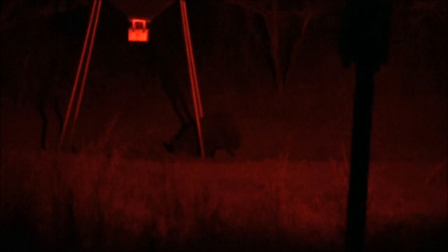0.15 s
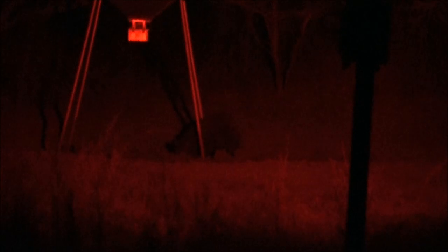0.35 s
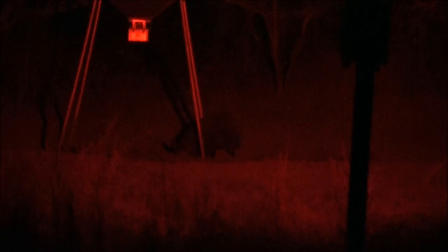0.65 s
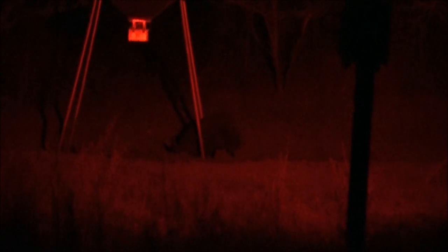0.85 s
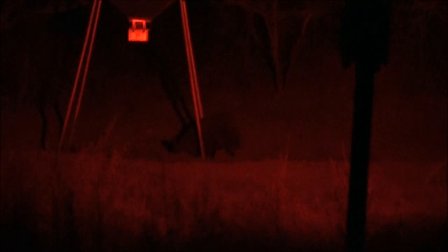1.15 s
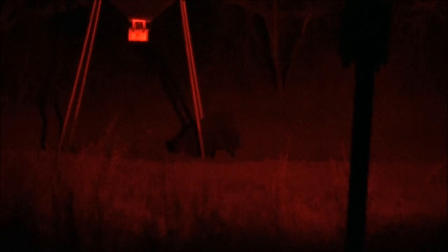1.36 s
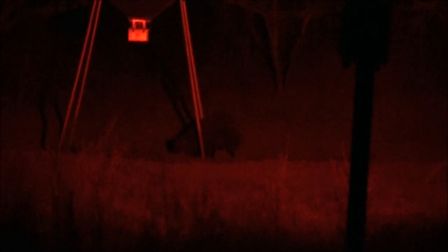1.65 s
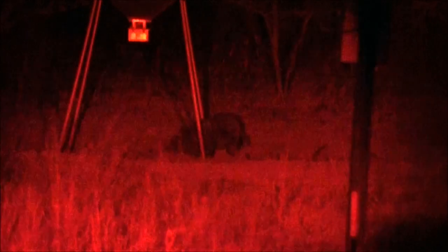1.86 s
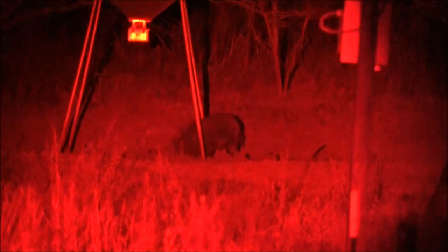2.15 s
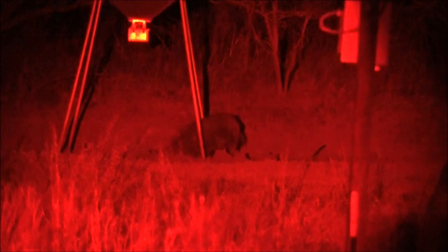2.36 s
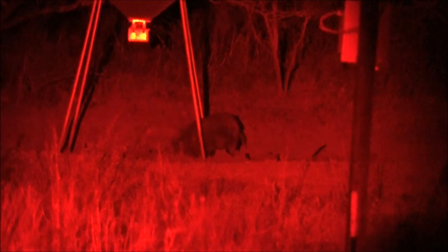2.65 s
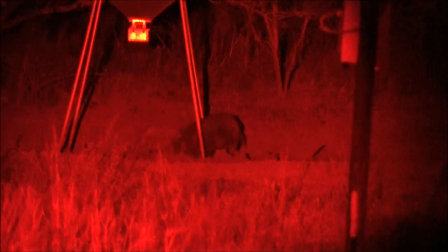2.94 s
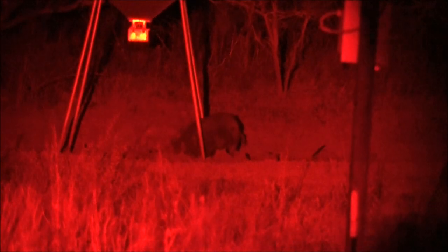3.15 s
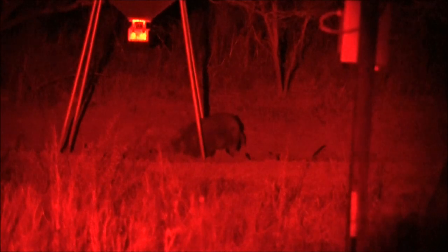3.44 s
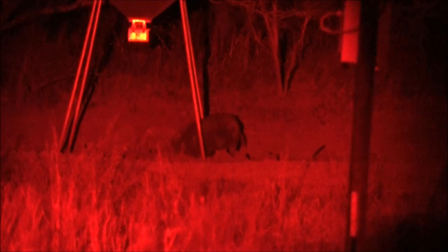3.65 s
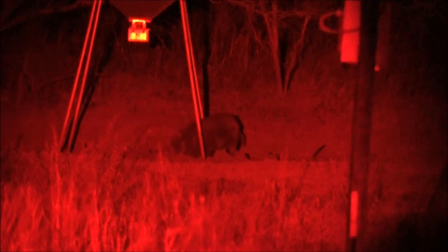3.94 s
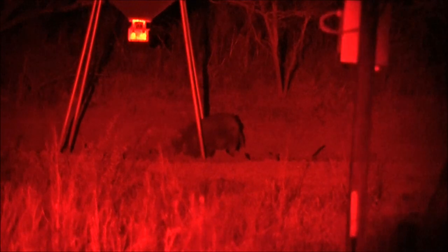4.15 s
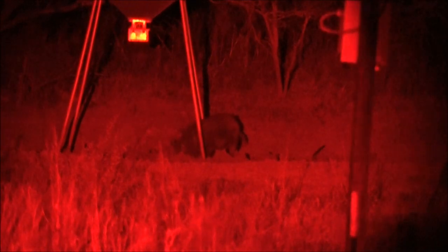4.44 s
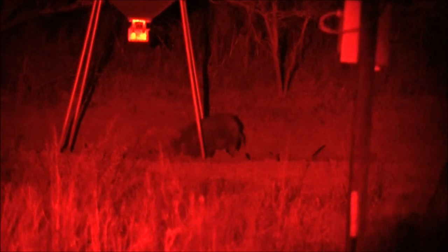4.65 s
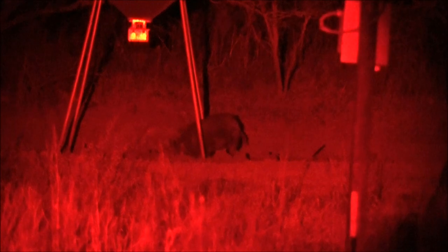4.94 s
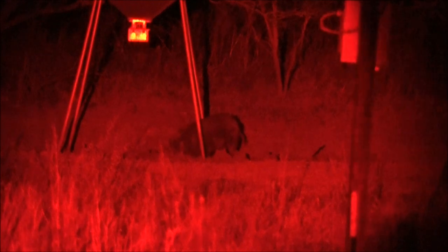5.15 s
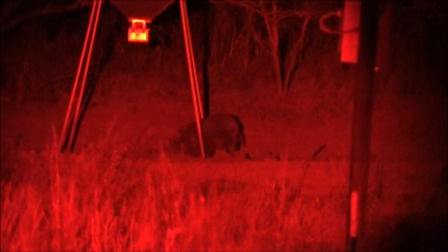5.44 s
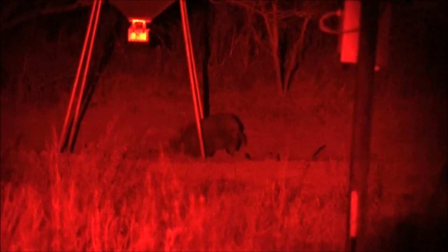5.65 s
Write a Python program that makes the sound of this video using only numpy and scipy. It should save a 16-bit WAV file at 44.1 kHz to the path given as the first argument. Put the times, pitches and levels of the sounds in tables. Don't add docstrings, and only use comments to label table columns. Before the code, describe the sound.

At night in dry brush, a dense steady chorus of crickets surrounds a small stereo camera, with katydids rasping as a fine high hiss above. Irregular low wind thumps bump the microphone, clustered at the start, around one second, near 2.8 and after five. A far engine idles underneath. Two crisp dry ticks snap at about 2.0 and 2.3 seconds; other ticks are barely audible.

```python
import sys
import numpy as np
from scipy import signal
from scipy.fft import irfft, next_fast_len
from scipy.io import wavfile
from scipy.ndimage import uniform_filter1d

SR = 44100
rng = np.random.default_rng(int(sys.argv[2]) if len(sys.argv) > 2 else 0)


def bounce(signal):
    frames = np.transpose(np.atleast_2d(signal))
    limited = np.clip(frames, -1, 1)
    pcm = np.round(limited * 32767).astype(np.int16)
    wavfile.write(sys.argv[1], SR, pcm)


def nominal_scale(level):
    x = np.asarray(level, float) / 20
    return 10 ** x


N = 255339

# (frequency [Hz], left-right coherence [0-1], left's phase lead [rad], left over right [dB])
PORT_PAIR = [(40, 0.99, 0, 0.9), (198, 0.975, 0, .3), (705, 0.94, 0, -1), (1120, .97, 0, 0),
             (4835, .985, 0, .4), (5520, 1, -0.2, .2), (6500, 0.88, -0.5, 0), (7600, .35, 1.5, -2),
             (7900, .05, 2.5, -1.5), (8470, 0.56, 3.5, 1.5), (10140, 0.65, 5.4, 4), (11260, 0.68, 5.9, 4.2),
             (11600, 0.99, 6.3, 0.5), (16000, 0.82, 6.3, 1.5)]


def at_hz(points, hz, axis=1):
    columns = np.transpose(points)
    return np.interp(np.log(hz + 1), np.log(columns[0] + 1), columns[axis])


def over_time(points, axis=1):
    columns = np.transpose(points)
    return np.interp(np.arange(N) / SR, columns[0], columns[axis])


def drift(per_s, size=N):
    values = rng.standard_normal(600)
    moments = np.arange(size) * (N / SR / size) * per_s
    return np.interp(moments, np.arange(600), values) * np.sqrt(3 / 2)


def during(spans, t):
    return sum((t > start) & (t < end) for start, end in spans) > 0


def evened(x):
    return x / np.sqrt(np.mean(x ** 2) + 1e-20)


def hiss(gain):
    size = next_fast_len(N)
    hz = np.fft.rfftfreq(size, 1 / SR)
    a, b, c, d = rng.standard_normal((len(hz), 4)).T
    coherence = np.clip(at_hz(PORT_PAIR, hz), 0, 1)
    left, unrelated = a + 1j * b, c + 1j * d
    delayed = left * np.exp(-1j * at_hz(PORT_PAIR, hz, axis=2))
    right = coherence * delayed + np.sqrt(1 - coherence ** 2) * unrelated
    tilt = nominal_scale(at_hz(PORT_PAIR, hz, axis=3) / 2)
    return evened(irfft(np.array([left * tilt, right / tilt]) * gain(hz), size)[:, :N])


def outlined(points):
    return lambda hz: nominal_scale(at_hz(points, hz)) * (hz > points[0][0]) * (hz < points[-1][0])


def crickets():
    # (frequency [Hz], level [dB])
    chirper_outline = [(1470, -4.5), (2500, -30), (2710, 13), (2940, 6.5), (3000, -9.5), (3900, -13.5),
                       (6600, -120)]
    tree_outline = [(1740, -36.5), (2950, -19.5), (3190, -1.5), (3360, 4), (3490, -7.5), (3660, -8.5),
                    (4050, -23), (5260, -80), (8910, -120)]
    ground_outline = [(2620, -63), (4450, -31), (5370, -8), (5870, 1.5), (6280, -4), (6750, -27),
                      (8780, -51), (14900, -120)]
    # (time [s], level [dB])
    chirper_swell = [(0, -56), (1, -59), (2.4, -59.5), (3.2, -57), (3.75, -63), (5.79, -61)]
    tree_swell = [(0, -43), (1, -42.5), (1.9, -41.5), (2.4, -43.5), (3.2, -42.5), (3.8, -42.5), (4.2, -43),
                  (5.6, -43.5), (5.79, -45)]
    chirp_turns = 3.6 * np.arange(N) / SR + 0.3 * drift(1.41)
    chirps = nominal_scale(1.1 * np.sin(2 * np.pi * (chirp_turns + 0.3)))
    low = chirps * chorus(chirper_outline, 2680, 2900, count=3, per_s=61., spread=0.009, duty=.7,
                          glide=0.027, far=0.77)
    tree = chorus(tree_outline, 3150, 3480, count=4, per_s=66., spread=.004, duty=.65, glide=.04, far=0.68)
    ground = chorus(ground_outline, 5250, 6350, count=8, per_s=75., spread=.2, duty=.6, glide=.05, far=0.93)
    ground_db = -31.5 + 0.17 * drift(5.)
    return nominal_scale(over_time(chirper_swell)) * low + nominal_scale(over_time(tree_swell)) * tree + nominal_scale(ground_db) * ground


def chorus(outline, low_hz, high_hz, count, per_s, spread, duty, glide, far):
    near = np.zeros((2, N), np.float32)
    for hz in np.linspace(low_hz, high_hz, count):
        luck = rng.standard_normal(3)
        stroke_rate = per_s * (1 + spread * luck[0] + .02 * drift(6.))
        turns = np.cumsum(stroke_rate) / SR + luck[1]
        stroke = np.clip((turns % 1) / duty, 0, 1)
        start = rng.uniform(0, 2 * np.pi, 900)[turns.astype(int) % 900]
        sliding_hz = hz * (1 + glide * (.5 - stroke))
        phase = (2 * np.pi * np.cumsum(sliding_hz) / SR + start) % (2 * np.pi)
        loudness = nominal_scale(at_hz(outline, hz)) * abs(1 + 0.32 * drift(3.4))
        envelope = loudness * np.sin(np.pi * np.float32(stroke)) ** 2
        scatter = np.sqrt(-2 * np.log(np.clip(at_hz(PORT_PAIR, hz), .01, 1)))
        lead = at_hz(PORT_PAIR, hz, axis=2) + luck[2] * scatter
        near += envelope * np.cos(np.float32([phase, phase - lead]))
    far = np.clip(far, 0, 1)
    return np.sqrt(1 - far) * evened(near) + np.sqrt(far) * hiss(outlined(outline))


def katydids():
    # (frequency [Hz], level [dB])
    rasp_outline = [(3880, -44), (6600, -22), (6840, -14), (7740, -7.5), (8600, -13), (10500, -3),
                    (11800, -0.5), (14300, -8.5), (15700, -12.5)]
    # (time [s], depth [dB])
    throb_depth = [(0, 0.6), (.9, 1), (1.5, .5), (3.5, 0.3), (4.8, 0.54), (5.3, 0.3), (5.79, .8)]
    turns = 13.0 * np.arange(N) / SR + 0.21 * drift(3.05) + 0.14
    throb_db = over_time(throb_depth) * (np.cos(2 * np.pi * turns) + 1.4 * np.cos(4 * np.pi * turns))
    shimmer_db = 0.18 * drift(0.92) + 0.54 * drift(21.94) + 0.081 * drift(30.)
    return nominal_scale(-35.5 + throb_db + shimmer_db) * hiss(outlined(rasp_outline))


def twigs():
    # (time [s], peak [dB], pitch [Hz], ring T60 [s], brightness [-])
    snaps = [(.224, -48, 1900, .006, .5), (.646, -48, 1880, 0.0042, 0.6), (1.955, -54, 1900, 0.007, .5),
             (2.0402, -18, 2100, 0.0027, 0.8), (2.3163, -24, 1640, 0.003, 1.1),
             (2.876, -54, 1510, 0.0066, .3), (3.33, -46, 1370, .015, 0.1), (3.345, -46, 1450, 0.019, 0.2),
             (3.415, -50, 1300, .015, 0), (4.49, -50, 1450, 0.011, .1), (4.67, -55, 1400, .015, .1),
             (5.107, -51, 1500, .008, .3)]
    # (time [s], level [dB])
    grass_brush = [
        (.2, -60),
        (.225, -54),
        (.25, -51),
        (.27, -66),
    ]
    out, t = np.zeros(N + 2000), np.arange(900) / SR
    for s, db, hz, t60, bright in snaps:
        ring = np.sin(2 * np.pi * hz * t)
        for ratio in (1.4, 2.0, 2.75, 3.2):
            if ratio * hz < 5700:
                ring += bright * np.sin(2 * np.pi * ratio * hz * t)
        ring *= nominal_scale(db - 60 * t / max(t60, .001)) * np.minimum(t / 0.00017, 1)
        ring = signal.lfilter(*signal.butter(2, 0.75 * hz, "high", fs=SR), ring)
        for late_s, share in ((0, 1), (.005, 0.21)):
            out[round((s + late_s) * SR):][:900] += share * ring
    grass = hiss(lambda hz: (hz > 500) / (1 + (hz / 2800.0) ** 4))
    grass = grass * during([(grass_brush[0][0], grass_brush[-1][0])], np.arange(N) / SR)
    return out[:N] * nominal_scale([[.6], [-.6]]) + nominal_scale(over_time(grass_brush)) * grass


def engine():
    # (time [s], rate [firings/s])
    firing_rate = [(0, 24.1), (2.2, 24.1), (2.6, 24.32), (4.2, 24.3), (4.5, 24.15), (5.79, 24.15)]
    # (time [s], level of one strong order [dB], load added to the high orders [dB])
    running = [(0, -45, 1), (.6, -45.5, 3), (1.5, -46.5, 4.5), (2.2, -49, -0.5), (3, -45, -5.5),
               (4, -48, -1), (5, -53, -1), (5.79, -50, -4.5)]
    # (multiple of the firing rate [-], level [dB])
    exhaust_orders = [(1, -20), (2, -39), (3, -1), (4, 0), (5, 0.5), (6, 2.5), (7, -1.5), (8, -17),
                      (9, -12.5), (10, -35), (11, -22), (12, -11), (13, -10.5), (14, -36), (15, -17),
                      (16, -39.5), (17, -49), (18, -29), (19, -45), (20, -23), (21, -29.5), (22, -25),
                      (23, -23), (24, -27), (25, -31), (26, -23.5), (27, -30)]
    every = 16
    turns = (np.cumsum(over_time(firing_rate)) / SR)[::every] + 0.1995
    size = len(turns)
    orders, load_db = np.zeros(size), over_time(running, axis=2)[::every]
    for k, db in exhaust_orders:
        lag = 0.03056 * k ** 2 + 0.045 * k * drift(7., size)
        order_db = db + load_db * (k >= 9) + 1.45 * drift(3.06, size)
        orders += nominal_scale(order_db) * np.cos(2 * np.pi * k * turns - lag)
    exhaust = nominal_scale(over_time(running)) * signal.resample_poly(orders, every, 1)[:N]
    return np.sqrt(2) * (exhaust + gear_whine())


def gear_whine():
    # (start [s], rise [s], fade [s], top [dB])
    swells = [
        (.55, 0.52, 0.51, -63),
        (2.1, .2, 0.27, -78),
        (3.7, 0.3, 1.4, -69.5),
    ]
    t = np.arange(N) / SR
    gain = nominal_scale(-78)
    for s, rise, fade, db in swells:
        away = np.maximum((s + rise - t) / rise, (t - s - rise) / fade)
        gain = gain + nominal_scale(db - 14.5 * away ** 1.6)
    return gain * np.cos(2 * np.pi * np.cumsum(769 + 1.41 * drift(5.8)) / SR)


def wind():
    # (frequency [Hz], density [dB/Hz])
    still_air = [(25, -32), (60, -8), (150, -13), (310, -22.5), (440, -33.5), (600, -26), (720, -36),
                 (1250, -35), (1600, -42.5), (1800, -37.5), (2400, -46.5), (4300, -46), (4700, -48)]
    # (low corner [Hz], high corner [Hz], steepness [-], level [dB])
    turbulence = [
        (33.3, 76, 4.5, 0.5),
        (76.3, 156, 3.1, -0.83),
        (203, 308, 3.5, -2),
    ]
    lumps, strength = drift(28.), eddies()
    out = nominal_scale(-46) * hiss(outlined(still_air))
    for k, (low_hz, high_hz, fall, db) in enumerate(turbulence):
        def band_gain(hz):
            low = hz / low_hz
            return low ** 3.52 / (1 + low ** 4.46) / (1 + (hz / high_hz) ** fall)

        band = hiss(band_gain)
        power = uniform_filter1d((band ** 2).mean(0), size=2400)
        band = band / np.sqrt(power + 0.3)
        out += strength[k] * nominal_scale(db + 1.25 * lumps) * band
    return out


def eddies():
    # (time [s], level [dB])
    breeze_flow = [(0, -31), (.6, -36), (1.5, -36.5), (2.2, -40), (2.6, -42.5), (3, -46), (3.4, -45),
                   (3.7, -41.5), (4.3, -47), (4.6, -42.5), (5.1, -38), (5.79, -42)]
    # (time [s], strength [dB], thud over buffet [dB], flutter over buffet [dB])
    strikes = [(0.081, -24, -3, -8), (0.211, -20.5, -5.5, -12), (.35, -35, 2, -11), (0.438, -31.5, 2, -21),
               (0.548, -26.5, -1.5, -14), (0.678, -38, 1, -9), (0.902, -33, -1.5, -9),
               (1.056, -22, -21, -21), (1.17, -29, -8, -20), (1.294, -36, -5, -6), (1.673, -33, 1.5, -18),
               (1.92, -35, -12, -9), (2.27, -36.5, 5, -13), (2.518, -37.5, -1, -12),
               (2.736, -21.5, -17, -7), (2.843, -24, -15, -10), (3.59, -28, -7, -14), (3.657, -37, 3, -4),
               (3.977, -29, -18, -10), (4.04, -41, 8, -1), (4.548, -36, -9, -12), (4.679, -25.5, -4, -12),
               (4.758, -27.5, -18, -30), (4.92, -44, -20, -14), (4.998, -35, -2, -19),
               (5.19, -25, -2, -7.5), (5.299, -22, -10, -17), (5.376, -20.5, -19, -13.5),
               (5.6, -39, -16, -11), (5.78, -38, -6, -22)]
    fall_db_per_s = [[233], [283], [400.]]
    t = np.arange(N) / SR
    power = nominal_scale(over_time(breeze_flow) + np.array([[-13.5], [0], [-9]])) ** 2
    for s, db, thud_db, flutter_db in strikes:
        near = slice(max(round((s - .3) * SR), 0), round((s + .3) * SR))
        fall_db = np.multiply(fall_db_per_s, abs(t[near] - s))
        power[:, near] += nominal_scale(db + np.array([[thud_db], [0], [flutter_db]]) - fall_db) ** 2
    return np.sqrt(power)


def scene():
    return crickets() + katydids() + twigs() + engine() * nominal_scale([[.2], [-.2]]) + wind()


def pan_treble(z, hz, t, wobble):
    # (from [s], to [s])
    left_spells = [(.15, .77), (.97, 1.24), (1.43, 2.0), (2.29, 2.82), (3.24, 3.29), (3.7, 4.7),
                   (4.75, 5.14), (5.45, 5.79)]
    # (from [s], to [s])
    joined_spells = [(.78, .96), (1.38, 1.8), (2.15, 2.18), (2.9, 2.92), (3.67, 3.69), (3.87, 4.06),
                     (4.7, 4.88), (5.56, 5.65)]
    balance_db = at_hz(PORT_PAIR, hz, axis=3)[:, None]
    panned = during(left_spells, t) & (drift(30., size=len(t)) + .75 > 0)
    joining = during(joined_spells, t)
    top = hz[:, None] > 11500 + 700 * ~panned + 250 * wobble[0]
    joined = top | (joining & (hz > 4600)[:, None])
    top_pan_db = 1.34 * panned * ~(joining & (wobble < .3))
    lower_pan_db = 4.0 * np.round(balance_db / 7.0 + .17 * wobble)
    pan = nominal_scale(np.where(top, top_pan_db, lower_pan_db))
    shared = z[0] * nominal_scale(-balance_db / 2 - 0.5)
    return np.where(joined, [shared * pan, shared / pan], z)


def drop_weak(left, right, hz, wobble):
    # (frequency [Hz], mid [dB], side [dB])
    floors = [(300, -100, -90), (800, -96, -87), (1500, -89, -78), (2400, -84.5, -74), (2700, -86, -72),
              (3300, -84, -70.5), (3900, -78.5, -70), (4600, -77, -70), (5400, -85, -78), (6700, -85, -78),
              (7200, -95, -88), (11500, -95, -98)]
    mid, side = (left + right) / 2, (left - right) / 2
    mid_floor = nominal_scale(at_hz(floors, hz)[:, None] + 1.9 * uniform_filter1d(wobble, size=3, axis=1))
    side_floor = nominal_scale(at_hz(floors, hz, axis=2)[:, None] + 1.4 * wobble)
    mid_rms = np.sqrt(abs(uniform_filter1d(abs(mid) ** 2, size=6, axis=0)))
    side_rms = np.sqrt(abs(uniform_filter1d(abs(side) ** 2, size=12, axis=0)))
    mid = mid * (mid_rms > mid_floor) * (abs(mid) > .6 * mid_floor)
    side = side * (side_rms > side_floor)
    return np.array([mid + side, mid - side])


def low_pass(x):
    return signal.sosfilt(signal.butter(12, 15870, fs=SR, output="sos"), x)


def record(dry):
    hz, t, z = signal.stft(dry, SR, "cosine", nperseg=2048)
    wobble = rng.standard_normal((len(hz) // 16 + 1, len(t)))
    wobble = wobble.repeat(16, axis=0)[:len(hz)]
    left, right = pan_treble(z, hz, t, wobble)
    kept = drop_weak(left, right, hz, wobble) * (hz < 15850)[:, None]
    mix = signal.istft(kept, SR, "cosine", nperseg=2048)[1][:, :N]
    return low_pass(mix)


dry = scene()
out = record(dry)
bounce(out)
```